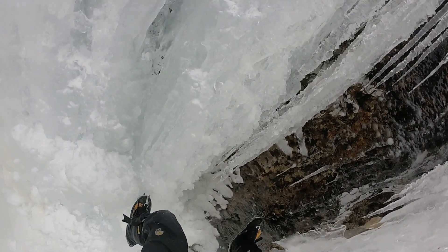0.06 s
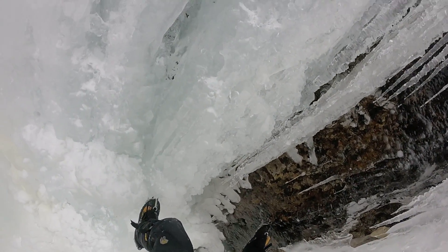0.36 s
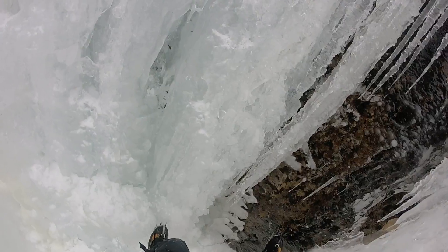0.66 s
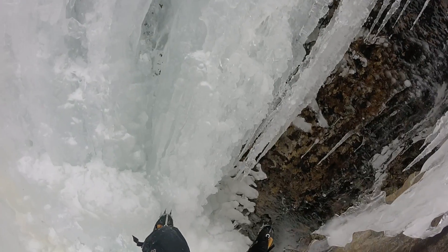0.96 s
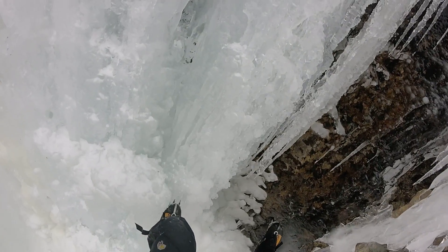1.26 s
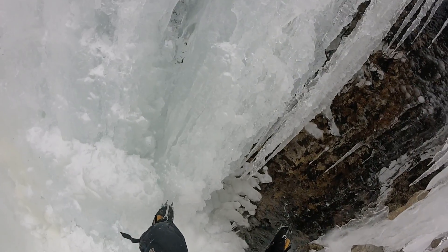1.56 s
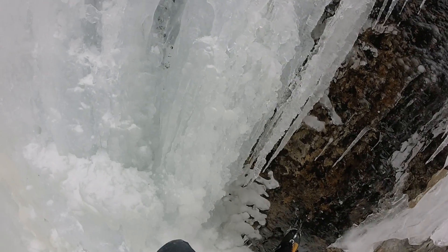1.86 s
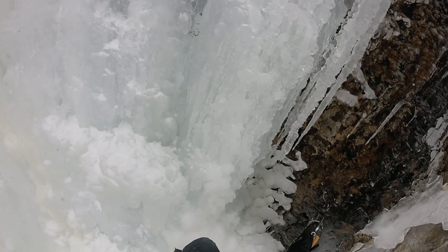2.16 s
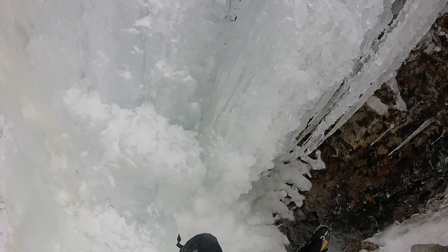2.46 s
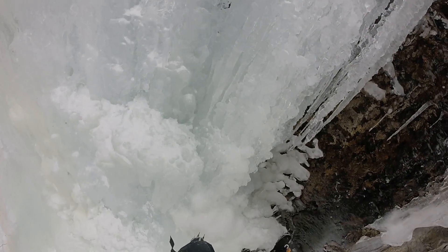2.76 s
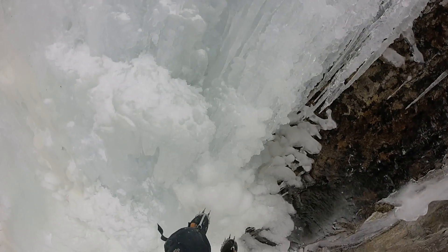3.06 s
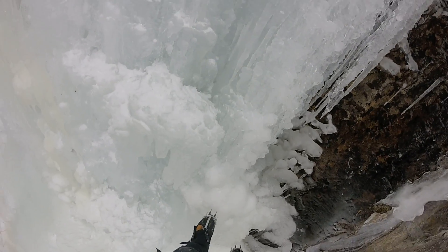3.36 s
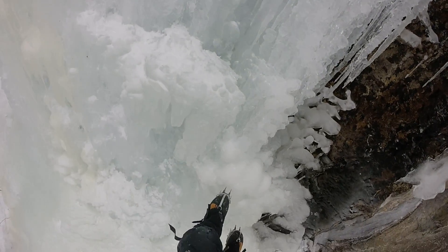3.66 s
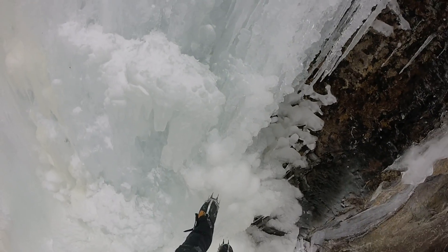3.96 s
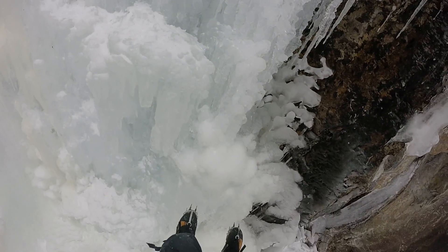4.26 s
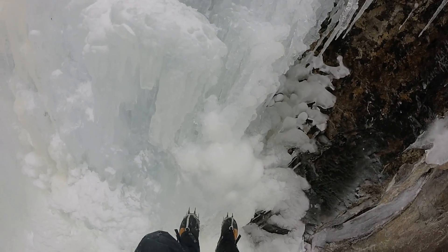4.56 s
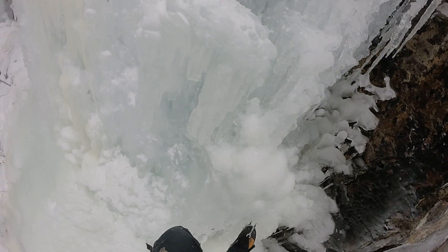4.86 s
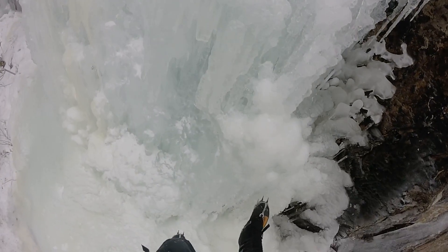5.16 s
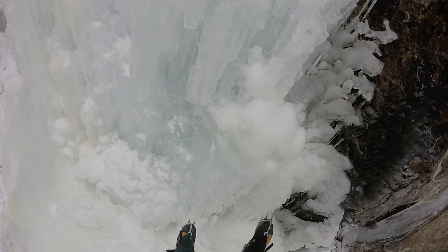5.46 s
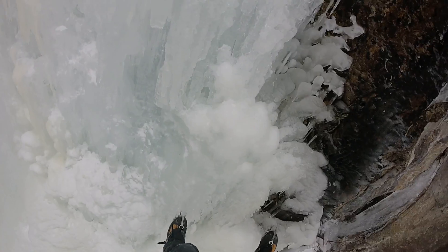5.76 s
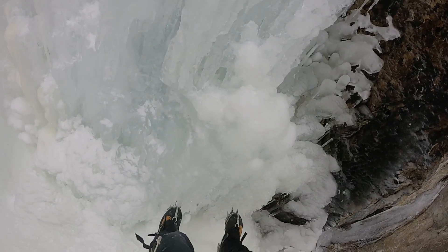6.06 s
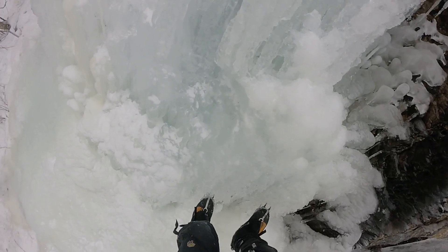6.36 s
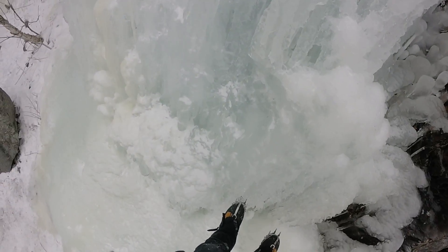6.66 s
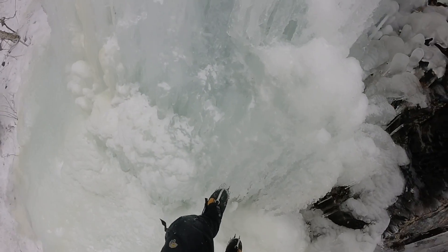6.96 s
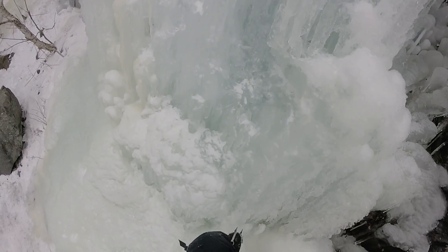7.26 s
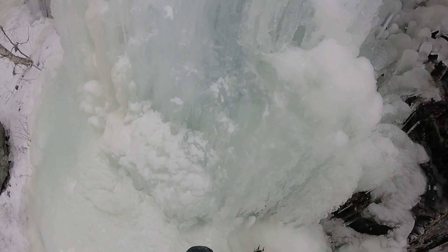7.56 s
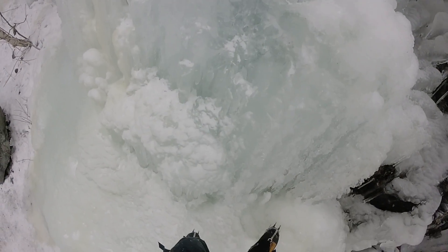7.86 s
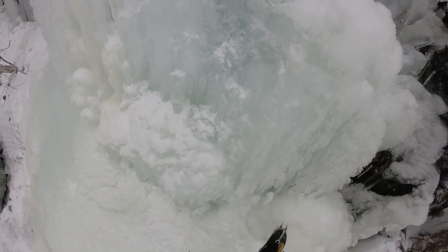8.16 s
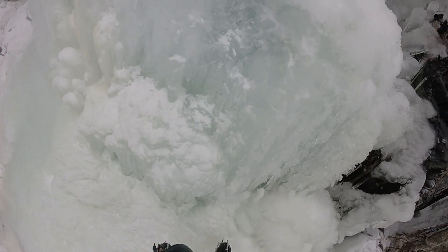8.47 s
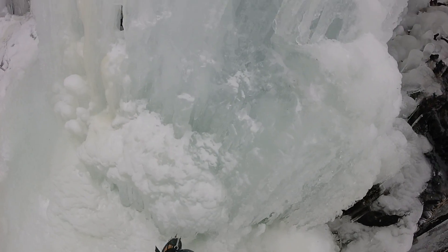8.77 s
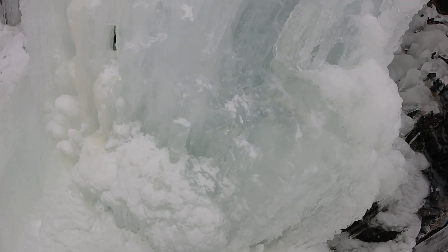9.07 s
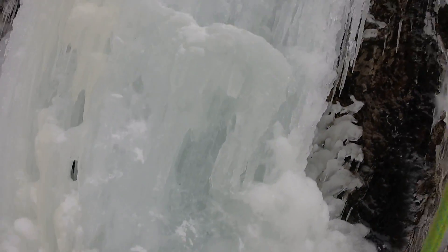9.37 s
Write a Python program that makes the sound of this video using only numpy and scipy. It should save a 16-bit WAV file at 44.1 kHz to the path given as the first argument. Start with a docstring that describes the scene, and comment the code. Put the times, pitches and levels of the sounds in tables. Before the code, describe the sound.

Heard close up from a microphone swaying on a helmet, steel boot spikes bite and grate on ice in uneven clusters. Clothing swishes, small metal parts tinkle lightly and the ice gives a few sharp snaps. Near the end a rope hits the helmet with a hollow slap and a short, loud, booming rasp, then the scraping resumes with another softer knock. A faint hush of gorge air lies underneath, without echo.

```python
"""Crampons, the steel spikes on a climber's boots, crunch and scrape down a frozen waterfall.
Each bite is a burst of tiny cracks in the ice, and single sharp snaps chirp through it.
The jacket and rope rustle and small metal parts tinkle. Late on, the rope slaps the helmet
and drags across its shell. All is heard close up from a camera that sways on the helmet,
over the faint hush of the gorge."""
import sys
import numpy as np
from scipy import signal
from scipy.fft import rfft, irfft
from scipy.io import wavfile
from scipy.ndimage import uniform_filter1d

SR = 44100
rng = np.random.default_rng(int(sys.argv[2]) if len(sys.argv) > 2 else 0)


def pcm_store(signal):
    """Save signal as 16-bit PCM."""
    levels = np.round(np.clip(np.atleast_2d(signal), -1, 1) * 32767)
    wavfile.write(sys.argv[1], SR, levels.astype(np.int16).T)


N = 419391
T = np.arange(N) / SR


def undb(db):
    """Turn decibels into a gain to multiply by."""
    return 10 ** (np.asarray(db) / 20)


def unit(x):
    """Scale a sound to an average strength (rms) of 1."""
    return x / np.sqrt(np.mean(x ** 2) + 1e-24)


def add(track, start_s, sound):
    """Mix a sound into a track at the given time."""
    i = max(int(start_s * SR), 0)
    track[i:i + len(sound)] += sound[:N - i]


def colour(x, points, size=1024):
    """Shape the tone to a curve of (Hz, dB) points."""
    hz, db = np.transpose(points)
    f = np.maximum(np.fft.rfftfreq(size, 1 / SR), 1)
    curve = undb(np.interp(np.log(f), np.log(hz), db))
    # folding the cepstrum makes a filter that never rings ahead of a hit
    cepstrum = irfft(np.log(curve))
    cepstrum[1:size // 2] *= 2
    cepstrum[size // 2 + 1:] = 0
    return signal.fftconvolve(x, irfft(np.exp(rfft(cepstrum))))[:len(x)]


def band(x, low_hz, high_hz):
    """Keep what lies between two pitches."""
    edges = [low_hz, min(high_hz, SR / 2 - 100)]
    return signal.sosfilt(signal.butter(3, edges, "band", fs=SR, output="sos"), x)


def resonance(x, hz, width_hz):
    """Ring at one pitch: the narrower the width, the longer the ring."""
    return signal.lfilter(*signal.iirpeak(hz, hz / width_hz, fs=SR), x)


def wander(rate):
    """A smooth random curve of size about 1 that turns `rate` times a second."""
    step = int(SR / rate)
    stairs = np.repeat(rng.standard_normal(N // step + 1), step)
    return unit(uniform_filter1d(stairs, step)[:N])


def grains(rate, spread_db):
    """Tiny random cracks or slips, `rate` a second: many weak, a few strong."""
    size = undb(spread_db * np.minimum(rng.exponential(size=N), 3.7))
    return unit((rng.random(N) < rate / SR) * size * rng.choice([-1, 1], N))


def swells(events, rise_share, release_s, rest_db):
    """One gain curve per dB column: each event rises, holds and fades to a resting level."""
    power = np.zeros((len(rest_db), N)) + undb(rest_db)[:, None] ** 2
    for start, length, *levels in events:
        t = T[:int((length + 6 * release_s) * SR)]
        rise = np.minimum(t / (rise_share * length), 1)
        fade = np.exp(-np.maximum(t - length, 0) / release_s)
        for track, db in zip(power, levels):
            add(track, start, (undb(db) * rise * fade) ** 2)
    return np.sqrt(power)


# The ringing of the camera's closed case. Each row: pitch in Hz, width in Hz, boost in dB.
CASE_RESONANCES = [(551, 27, 7), (870, 84, 4.5), (1619, 39, 8), (1734, 41, 9), (1885, 73, 8),
                   (2037, 77, 11), (2364, 103, 7.5), (2603, 30, 7), (2753, 146, 7.5), (3095, 120, 4),
                   (3600, 140, 2.5), (3950, 70, 3), (4190, 140, 4), (5025, 330, 10), (8030, 200, 3.5),
                   (8360, 190, 2.5), (10430, 410, 3)]

def camera_case(x):
    """The case boosts some pitches, so sound passing through it turns hollow."""
    for hz, width, db in CASE_RESONANCES:
        x = x + (undb(db) - 1) * resonance(x, hz, width)
    return x


# The tone of the air. Each row: pitch in Hz, relative level in dB.
AIR_TONE = [(60, -19), (200, -1), (350, -2.5), (750, -8), (1400, -9.5), (2200, -15), (3200, -12.5),
            (4300, -20), (6200, -21.5), (11000, -24.5), (15500, -39)]

def gorge_air(level_db=-60, waver_db=1.5):
    """The gorge gives a faint hush that wavers a little."""
    hush = unit(camera_case(colour(rng.standard_normal(N), AIR_TONE)))
    return hush * undb(level_db + waver_db * wander(11))


# The tones of the rocking mount and of the straps. Each row: pitch in Hz, relative level in dB.
SWAY_TONE = [(5, -1.5), (12, 2.5), (22, -10.5), (36, -11), (48, -11.5), (58, -2.5), (70, -18), (95, -23),
             (160, -45), (300, -70)]
STRAP_TONE = [(70, -9), (130, 4.5), (230, -2.5), (300, -12), (420, -17), (560, -8.5), (750, -19.5),
              (1300, -9), (2500, -47.5)]
# Shifts of weight that jog the helmet. Each row: start in seconds, length in seconds,
# relative sway level in dB, relative strap level in dB.
WEIGHT_SHIFTS = [(0.38, 0.24, -38.5, -59), (0.72, 0.27, -45.5, -67), (1.088, 0.065, -39.5, -64),
                 (1.246, 0.21, -42, -60), (1.75, 0.26, -38, -57.5), (2.03, .385, -39.5, -60),
                 (2.448, 0.17, -36, -56.5), (2.95, 0.38, -41.5, -64.5), (3.722, 0.22, -42, -64),
                 (4.078, 0.24, -37.5, -59.5), (4.526, 0.22, -37.5, -68), (5.248, .2, -42, -61),
                 (5.48, 0.34, -36, -58), (6.152, 0.17, -40.5, -66), (6.418, 0.054, -35.5, -64),
                 (6.782, .092, -38.5, -71), (7.11, 0.38, -40, -58), (7.806, 0.46, -40.5, -67),
                 (8.65, 0.25, -37.5, -73.5), (9.176, 0.35, -39.5, -51.5)]

def camera_mount(sway_db=2, strap_db=-1):
    """The camera rocks on its mount and the straps rub as the head moves."""
    sway, strap = swells(WEIGHT_SHIFTS, rise_share=0.17, release_s=0.048, rest_db=(-46, -61.5))
    rocking = unit(colour(rng.standard_normal(N), SWAY_TONE, size=16384))
    rubbing = unit(colour(grains(rate=900, spread_db=5.5), STRAP_TONE, size=4096))
    return undb(sway_db) * sway * rocking + undb(strap_db) * strap * rubbing


# The tone of breaking ice. Each row: pitch in Hz, relative level in dB.
ICE_TONE = [(150, -17), (550, -14.5), (750, -17.5), (1350, -5.5), (1650, -2.5), (2100, -6), (3200, 0),
            (4400, -15.5), (5500, -16), (7300, -19.5), (8500, -17), (10700, -26.5), (12500, -32),
            (15500, -45)]

def ice_sound(cracks):
    """Give bare clicks the tone of ice, heard through the camera's case."""
    return camera_case(colour(cracks, ICE_TONE))


# Moves of a leg, an arm or the rope. Each row: start in seconds, length in seconds,
# relative scrape level in dB, relative cloth level in dB.
CLIMBER_MOVES = [(0.1, 0.055, -53, -57), (0.2, .22, -52, -56), (0.448, .03, -53.5, -61),
                 (0.648, 0.027, -52.5, -75.5), (0.714, .134, -50.5, -60.5), (0.944, .064, -45, -53),
                 (1.182, .035, -49, -66), (1.24, .257, -47, -50), (1.66, .087, -53, -60.5),
                 (1.75, .2, -49.5, -58), (1.994, .173, -48, -58), (2.314, .11, -46, -50.5),
                 (2.47, .18, -53, -65), (2.654, .178, -58.5, -61), (2.986, .03, -54.5, -74),
                 (3.044, .146, -50.5, -56), (3.41, 0.054, -54.5, -74), (3.632, .115, -48.5, -55),
                 (3.87, 0.1, -58.5, -63), (4.03, .21, -52, -56), (4.344, 0.12, -52.5, -58.5),
                 (4.606, .11, -51, -53.5), (4.738, 0.12, -53, -59), (5.028, .18, -56, -58.5),
                 (5.256, .03, -52, -79), (5.56, .26, -51.5, -60), (5.874, .1, -53, -64),
                 (6.13, 0.14, -42.5, -47.5), (6.27, .14, -47, -60), (6.42, .24, -56, -59),
                 (6.8, 0.19, -48, -56), (7.01, .25, -46, -59), (7.228, .097, -53, -54),
                 (7.34, .22, -54.5, -59.5), (7.628, .045, -51.5, -58), (7.784, .267, -52.5, -58),
                 (8.08, .16, -51, -64), (8.696, .035, -56.5, -60.5), (8.8, .09, -51, -68),
                 (8.98, .03, -49.5, -64), (9.19, .13, -46.5, -59.5), (9.366, .14, -45, -54.5)]

def effort():
    """How strongly ice is scraped and cloth is rubbed; the hanging climber is never quite still."""
    return swells(CLIMBER_MOVES, rise_share=0.36, release_s=0.026, rest_db=(-63, -68))


# The tone of the jacket's cloth. Each row: pitch in Hz, relative level in dB.
JACKET_TONE = [(2500, -8), (3400, -1), (4400, -12), (6000, -9), (7300, -11), (8400, -11), (9500, -15.5),
               (11200, -16.5), (12800, -26), (15500, -53)]

def scrape_and_rustle(scrape_db=-2.5, cloth_db=0.56, jerk_db=3.5, flutter_db=3):
    """Spikes and rope grate over the ice in small jerks while the jacket swishes."""
    scrape, cloth = effort()
    jerks = wander(70)
    grit = band(ice_sound(grains(rate=1500, spread_db=1)), 300, 3770)
    # as the contact shifts, one pitch after another stands out
    rings = sum(undb(-1 + 5 * wander(25)) * resonance(grit, hz, 170) for hz in (1697, 2013, 2550, 3330))
    grating = scrape * unit(grit + rings) * undb(scrape_db + jerk_db * jerks)
    weave = unit(camera_case(colour(grains(rate=12000, spread_db=0.5), JACKET_TONE)))
    return grating + cloth * weave * undb(cloth_db + flutter_db * jerks)


# Metal gear touching. Each row: start in seconds, relative level in dB, pitch in Hz.
GEAR_TOUCHES = [(0.784, -51.5, 9700), (1.715, -54.5, 7900), (2.429, -49.5, 9800), (3.386, -71, 10900),
                (3.959, -49, 8640), (7.316, -60, 11100), (7.424, -61, 11400), (7.499, -69, 12500),
                (7.669, -50, 11000), (7.839, -60, 12600), (7.926, -57, 11050), (7.993, -65, 12600),
                (8.053, -47, 11000), (8.441, -57, 11450), (8.713, -56, 11600)]

def gear_tinkles(ring_s=0.049, gain_db=2.91):
    """Each touch makes a small metal part ring with one high, short tone."""
    out, t = np.zeros(N), T[:SR // 5]
    fade = np.exp(-np.log(1000) * t / ring_s)
    for start, db, hz in GEAR_TOUCHES:
        add(out, start, undb(db + gain_db) * np.sin(2 * np.pi * hz * t) * fade)
    return out


# The helmet's own tones. Each row: pitch in Hz, relative level in dB,
# seconds to fade by 60 dB when damping is 1.
SHELL_TONES = [(116, -14, 0.24), (165, 2, 0.076), (208, 4.5, 0.06), (237, -12, 0.13), (322.4, -12.5, 0.15),
               (541, 0, 0.068), (605, -12, 0.11), (710, -33, .05), (880, -28, .1), (901, -1, 0.051),
               (1002, -3, 0.049), (1079, -28.5, 0.31), (1275, -9, 0.055), (1570, -1.5, 0.031),
               (1612, 2.5, 0.037), (1647, 3.5, 0.028), (1880, -21, 0.29), (1990, -4.5, .04),
               (2036, 8.5, 0.025), (2110, -3, 0.028), (2210, -11, 0.029), (2400, -1, 0.03),
               (2450, -5.5, 0.038), (2600, -4.5, 0.025), (2765, -3, 0.071), (2830, -25, 0.32),
               (3150, -28, .02)]

def helmet_shell(push, damping=1):
    """A push sets the shell ringing; more damping makes it die away sooner."""
    t = T[:SR // 2]
    ring = sum(undb(db) * np.cos(2 * np.pi * hz * t) * np.exp(-np.log(1000) * damping * t / ring_s)
               for hz, db, ring_s in SHELL_TONES)
    # between its low and middle tones the shell hardly moves
    ring = ring - resonance(ring, hz=400, width_hz=135)
    return signal.fftconvolve(push, ring)[:N]


# The tone of rope on the helmet. Each row: pitch in Hz, relative level in dB.
RASP_TONE = [(1500, -8.5), (3000, -13.5), (3900, 0), (5100, -1.5), (5800, -12.5), (6600, -18.5),
             (7800, -29), (9200, -27), (10000, -18), (11000, -32), (14000, -53)]

def rope_rasp(x):
    """Give noise the bright rasp of rope on a hard shell."""
    return colour(x, RASP_TONE)


SOFT_LIMIT_HZ = 2600  # soft fibres cannot shake the shell much above this pitch
# Blows and nudges on the helmet. Each row: start in seconds, relative level in dB, contact in seconds.
HELMET_BLOWS = [(1.826, -22, .005), (5.419, -20.5, 0.0048), (8.2437, -6, 0.00037), (8.2453, 2, 0.00033),
                (8.2457, 3.5, 0.0093), (9.383, -15.5, 0.0053), (9.44, -25, 0.0024)]

def helmet_slaps(ring_db=-16, crack_db=-27, crack_s=0.0026):
    """Each blow gives a short crack and a push that rings the shell."""
    pushes, cracks, t = np.zeros(N), np.zeros(N), T[:SR // 20]
    for start, db, contact in HELMET_BLOWS:
        push = t * np.exp(-4 * t / contact)
        add(pushes, start, undb(db) * push / push.sum())
        add(cracks, start, undb(db) * np.exp(-t / crack_s) * rng.standard_normal(len(t)))
    ring = helmet_shell(band(pushes, 33, SOFT_LIMIT_HZ), damping=0.8)
    return undb(ring_db) * ring + undb(crack_db) * rope_rasp(cracks)


# The rope's pull over the helmet. Each row: time in seconds, then relative rub, hiss and boom in dB.
DRAG_LEVELS = [(8.243, -60, -60, -36), (8.25, -29, -43, -12), (8.275, -40, -40.5, -36),
               (8.31, -32, -37, -18.5), (8.332, -16.5, -28.5, -14.5), (8.38, -16, -28, -22),
               (8.403, -11, -29, -31), (8.427, -10.5, -32, -21), (8.436, -55, -65, -31),
               (8.55, -100, -100, -59)]

def rope_drag(boom_db=-1):
    """The rope's weave stutters over the shell, harder and harder, and slips off."""
    times, *levels = np.transpose(DRAG_LEVELS)
    touching = (T > times[0]) * (T < times[-1])
    rub_gain, hiss_gain, boom_gain = (undb(np.interp(T, times, db)) * touching for db in levels)
    slips = grains(rate=3700, spread_db=2)
    tugs = band(slips, 29, SOFT_LIMIT_HZ)
    rub = helmet_shell(tugs * rub_gain) / np.std(helmet_shell(tugs))
    hiss = unit(rope_rasp(slips)) * hiss_gain
    # the mount is tugged too and booms at its two lowest pitches
    mount_ring = resonance(slips, 66, 16) + 0.58 * resonance(slips, 125, 22)
    boom = unit(band(mount_ring, 43, 192)) * boom_gain
    return rub + hiss + undb(boom_db) * boom


def through_thin_ice(x, lag_s=0.002134, ref_hz=2000):
    """High pitches run ahead as thin ice bends, so a crack chirps downward."""
    f = np.fft.rfftfreq(len(x), 1 / SR)
    delay = lag_s * (np.sqrt(ref_hz / np.maximum(f, ref_hz / 4)) - np.sqrt(ref_hz / f[-1]))
    phase = 2 * np.pi * np.cumsum(delay) * f[1]
    return irfft(rfft(x) * np.exp(-1j * phase), len(x))


# Single sharp breaks in the ice. Each row: start in seconds, peak level of the chirp in dB.
ICE_SNAPS = [(0.5736, -29.5), (1.385, -25.5), (2.569, -36), (3.813, -41), (4.8826, -33.5), (5.224, -35),
             (5.377, -35.5), (6.133, -37.5)]

def ice_snaps(high_hz=4800, low_hz=1960, glide_s=0.00218, attack_s=0.0027, ring_s=0.007, crack_s=0.0033):
    """A crack, and a chirp that drops fast to the pitch at which the ice rings, never twice the same."""
    out, t = np.zeros(N), T[:SR // 10]
    shape = np.minimum(t / attack_s, 1) * np.exp(-t / ring_s)
    for start, db in ICE_SNAPS:
        detune, stretch = rng.uniform(-1.13, 1, 2)
        glide = np.exp(-t / (glide_s * (1 + 0.5 * stretch)))
        hz = (1 + 0.034 * detune) * (low_hz + (high_hz - low_hz) * glide)
        chirp = unit(np.sin(2 * np.pi * np.cumsum(hz) / SR) * shape)
        burst = np.exp(-t / crack_s) * rng.standard_normal(len(t))
        crack = unit(ice_sound(through_thin_ice(burst)))
        add(out, start, undb(db) * (chirp + crack) / chirp.max())
    return out


def light_bites(count=28, low_hz=1650, high_hz=2700):
    """Rows like CRAMPON_BITES for light touches of the spikes, likelier when the climber moves hard."""
    scrape, _ = effort()
    chance = np.cumsum(scrape)
    rows = []
    for when, duration, force, pitch in rng.random((count, 4)):
        start = np.searchsorted(chance, when * chance[-1]) / SR
        force_db = 2 * (2 * force - 1)
        hz = low_hz * (high_hz / low_hz) ** (pitch ** 2)
        rows.append((start, 0.013 * (0.5 + duration), -50 + force_db, -57 + force_db, hz, 6))
    return rows


# Spikes biting the ice. Each row: start in seconds, length in seconds, body level in dB,
# treble level in dB, ring pitch in Hz, gain of the ring within the body in dB.
CRAMPON_BITES = [(0.108, .03, -48.5, -61, 2610, -2), (0.519, .013, -43.5, -55, 1700, -12),
                 (0.769, 0.0091, -33, -36.5, 3440, 13.5), (1.047, 0.0091, -46, -52, 1640, -1),
                 (1.177, 0.021, -40.5, -47, 1900, -5), (1.221, 0.0095, -41, -48, 1668, 12),
                 (1.278, 0.011, -34.5, -49, 1610, 3), (1.326, 0.0077, -67, -42.5, 3340, 3),
                 (1.338, 0.017, -39.5, -34, 3200, 3), (1.462, 0.018, -36.5, -52, 1620, 16),
                 (1.495, .023, -44.5, -50, 1650, 5), (1.611, 0.0087, -51.5, -53, 1680, 3),
                 (1.708, 0.0087, -44, -50, 1650, 25), (1.742, 0.039, -45, -52, 1720, -4),
                 (1.826, 0.015, -41.5, -47, 2060, 12), (1.849, 0.02, -40.5, -43, 2620, -1),
                 (1.958, 0.027, -41, -45.5, 1760, 8), (2.072, 0.022, -38.5, -52, 1700, 24),
                 (2.12, 0.011, -33.5, -34.5, 3200, 6), (2.508, .021, -44, -50, 1670, 14),
                 (2.653, 0.0099, -51, -46, 3600, -9), (3.112, 0.014, -44.5, -44.5, 1970, 3),
                 (3.132, 0.024, -47, -43.5, 3590, -11), (3.159, .0076, -49, -43.5, 3120, -5),
                 (3.253, .011, -31.5, -46.5, 1920, 0), (3.383, 0.011, -37.5, -43.5, 1730, 23),
                 (3.416, 0.011, -47, -67, 2300, 13), (3.727, 0.034, -42, -52, 1650, 41),
                 (3.759, 0.015, -43, -60, 1680, 3), (3.824, .011, -41.5, -70, 1710, 5),
                 (3.895, 0.0067, -45.5, -61, 3100, 6), (3.959, 0.012, -45, -53, 2000, 1),
                 (4.057, 0.036, -42, -54, 1770, 16), (4.096, 0.026, -43, -65, 1770, 31),
                 (4.124, .018, -28, -41.5, 1700, 23), (4.232, 0.018, -42, -48, 2060, 0),
                 (4.264, 0.019, -40.5, -52, 1640, 9), (4.318, 0.022, -45.5, -53, 1640, 2),
                 (4.409, 0.022, -44.5, -54, 1600, 14), (4.668, .024, -47.5, -56.5, 1670, 11),
                 (4.806, 0.025, -42.5, -49, 1640, 17), (4.827, 0.028, -45.5, -57, 1685, 15),
                 (4.927, 0.01, -50, -53, 1770, 5), (5.415, 0.014, -49, -73, 2330, 3),
                 (5.644, 0.0071, -43, -60, 2260, -12), (5.722, 0.018, -37, -44, 3050, 9),
                 (5.732, 0.031, -35.5, -43.5, 1990, 26), (5.751, 0.024, -32.5, -50, 2020, 32),
                 (5.757, 0.014, -31, -49, 2590, 20), (6.152, 0.059, -41.5, -45, 1710, 6),
                 (6.19, 0.036, -33.5, -55, 1990, 9), (6.226, 0.026, -41, -56, 1690, 13),
                 (6.255, 0.0077, -32, -39.5, 2350, 3), (6.27, 0.013, -36, -40.5, 1950, 8),
                 (6.285, 0.012, -33, -48, 2020, 10), (6.363, 0.0094, -40.5, -55, 2030, -7),
                 (6.407, 0.035, -45.5, -66, 1590, 26), (6.521, 0.0068, -43, -44, 1990, -4),
                 (6.572, .004, -61, -44.5, 3020, -1), (6.584, 0.0063, -40, -52, 2030, -6),
                 (7.064, 0.0079, -33, -47, 2000, 8), (7.086, 0.0093, -34, -34.5, 2000, 12),
                 (7.098, 0.044, -42, -46, 1990, -5), (7.148, .03, -44, -52, 2580, 22),
                 (7.177, .01, -30.5, -37, 2510, 20), (7.283, 0.018, -41, -47, 2290, 12),
                 (7.386, 0.0065, -44.5, -59, 2650, 0), (7.587, 0.0044, -38.5, -40, 2620, 11),
                 (7.67, 0.0016, -32, -49, 3050, 15), (7.691, .005, -48, -37, 3520, 5),
                 (7.775, 0.0083, -45.5, -52, 2560, 2), (7.923, 0.0063, -41, -47, 3290, 5),
                 (7.969, 0.0026, -44, -48.5, 1740, 11), (8.05, 0.0075, -64, -37.5, 3340, -2),
                 (8.085, 0.0046, -38.5, -53, 2670, 0), (8.637, 0.026, -42.5, -44.5, 2840, 6),
                 (8.74, 0.0076, -44.5, -46.5, 1750, -17), (8.801, 0.018, -33, -42.5, 1700, 10),
                 (8.827, 0.0088, -47, -43, 1750, 23), (8.902, 0.018, -43.5, -52.5, 1790, 11),
                 (8.997, 0.0095, -43, -51, 1680, 2), (9.009, .013, -42, -52.5, 2000, 20)]

def crampon_bites(first_crack=2.3, crumbs_db=-25, crumbs_s=0.048, frame_hz=3300, frame_db=-6):
    """A steel spike breaks in: a first crack, a cluster of cracks that rings briefly, then crumbs."""
    # cracks come in little avalanches
    cracks = unit(grains(rate=3500, spread_db=2.5) * undb(3 * wander(250)))
    out, t = np.zeros(N), T[:SR // 7]
    crumbs = undb(crumbs_db) * np.exp(-t / crumbs_s)
    for start, length, body_db, treble_db, hz, ring_db in CRAMPON_BITES + light_bites():
        push = np.exp(-0.81 * t / length) / (1 + (t / length) ** 8)
        cluster = np.take(cracks, int(start * SR) + np.arange(len(t)), mode="wrap") * (push + crumbs)
        cluster[SR // 2000] += first_crack
        crunch = ice_sound(through_thin_ice(cluster))
        # each bite favours its own pitch and also wakes a high tone of the crampon's frame
        ring = resonance(crunch, hz, 95) + undb(frame_db) * resonance(crunch, frame_hz, 130)
        body = unit(band(crunch, 180, 5630) + undb(ring_db) * ring)
        treble = unit(band(crunch, 4400, 20000))
        length_gain = np.sqrt(length / t[-1])  # makes the levels count over the bite's own length
        add(out, start, length_gain * (undb(body_db) * body + undb(treble_db) * treble))
    return out


def scene():
    """Mix all the sources into one channel, close and without echo."""
    climbing = crampon_bites() + ice_snaps() + scrape_and_rustle() + gear_tinkles()
    helmet = helmet_slaps() + rope_drag() + camera_mount()
    return (climbing + helmet + gorge_air())[None]


def record(dry):
    """The camera flattens the loudest peaks and cuts the treble above 15400 Hz."""
    treble_cut = signal.ellip(8, 0.2, 70, 15400, fs=SR, output="sos")
    return signal.sosfilt(treble_cut, np.clip(dry, -0.95, 0.95))


dry = scene()
out = record(dry)
pcm_store(out)
```